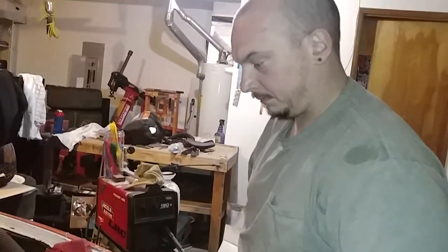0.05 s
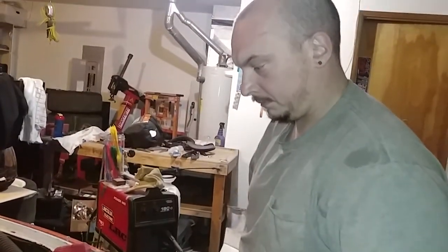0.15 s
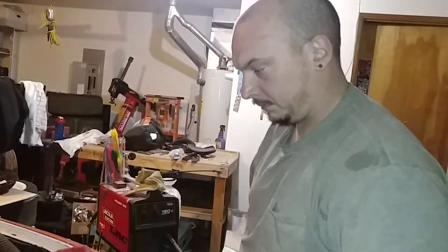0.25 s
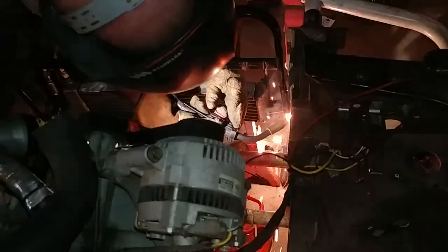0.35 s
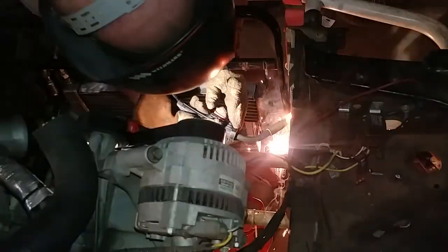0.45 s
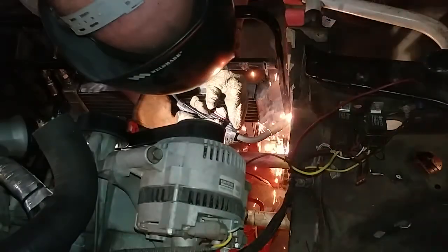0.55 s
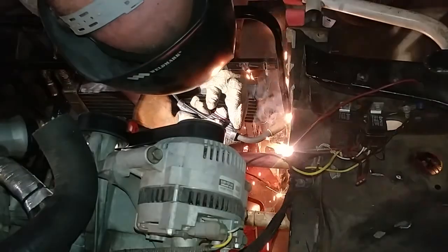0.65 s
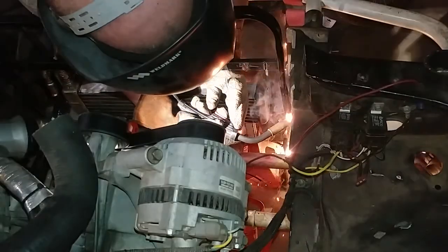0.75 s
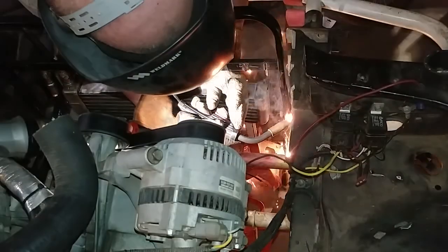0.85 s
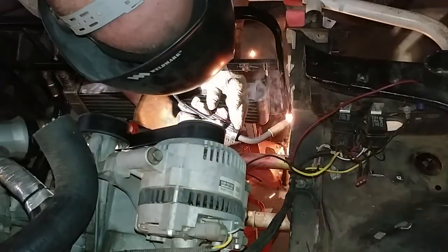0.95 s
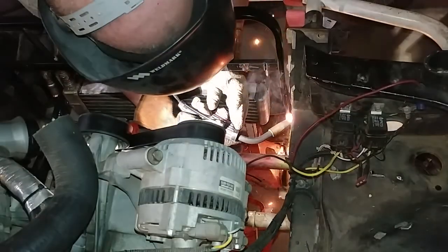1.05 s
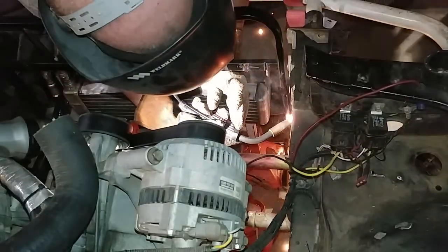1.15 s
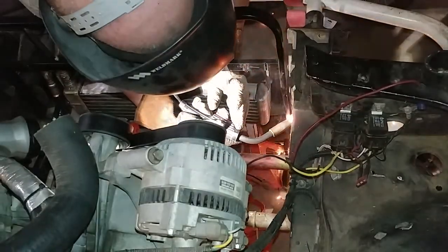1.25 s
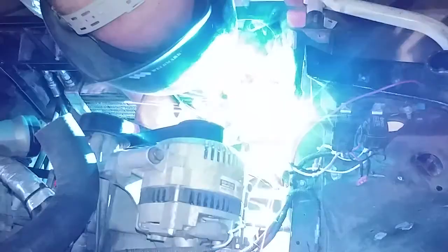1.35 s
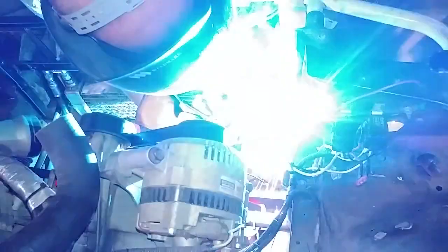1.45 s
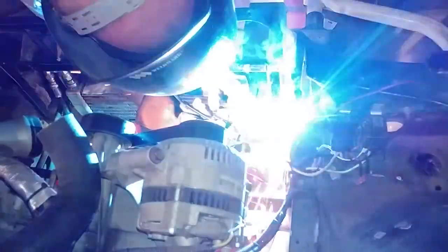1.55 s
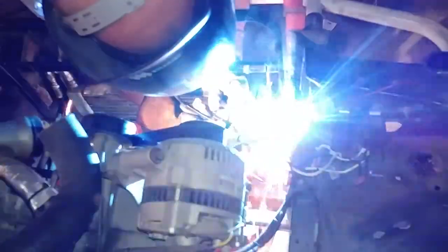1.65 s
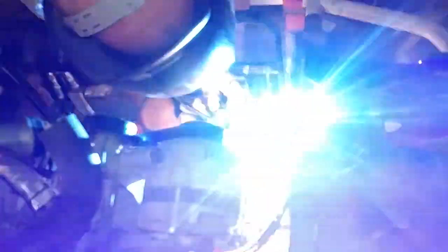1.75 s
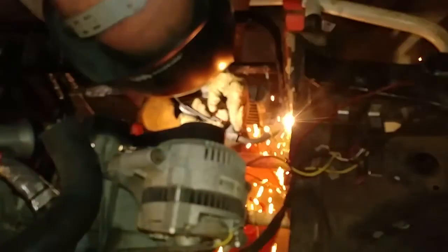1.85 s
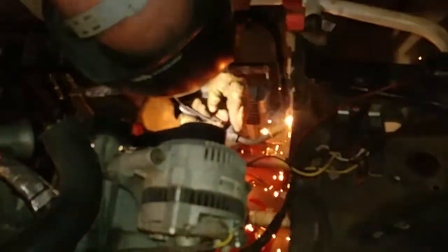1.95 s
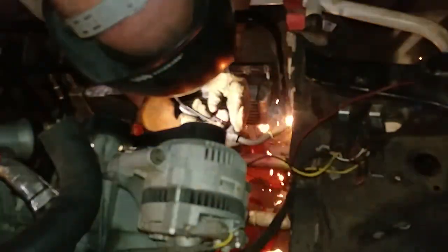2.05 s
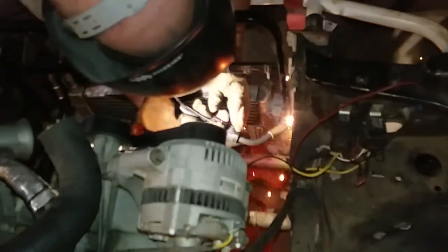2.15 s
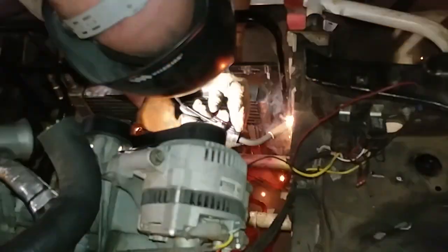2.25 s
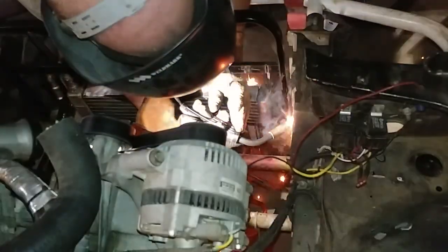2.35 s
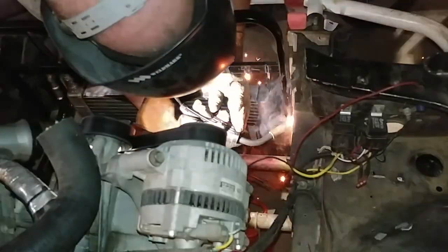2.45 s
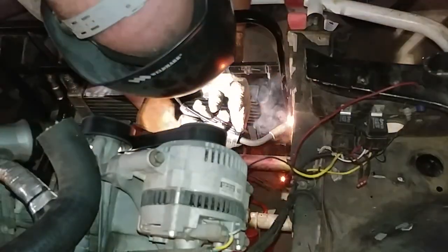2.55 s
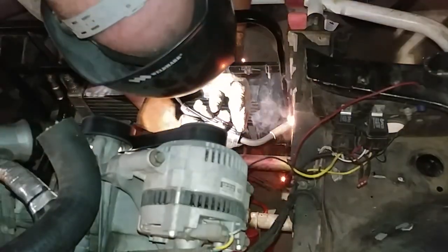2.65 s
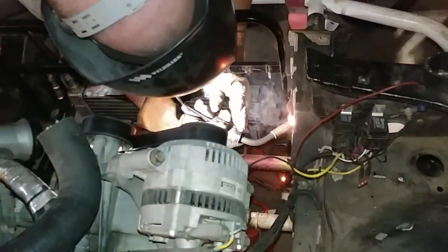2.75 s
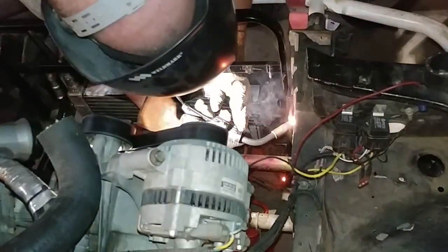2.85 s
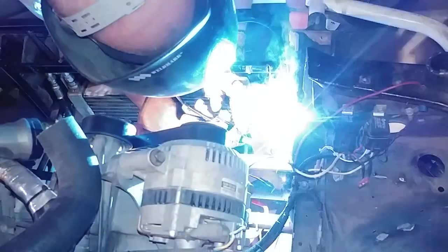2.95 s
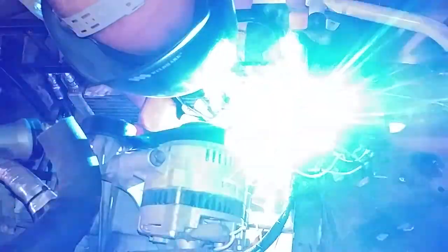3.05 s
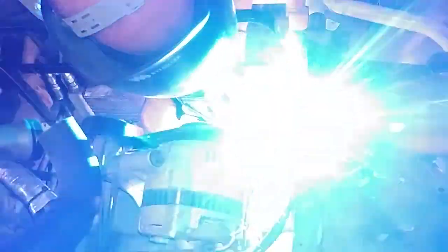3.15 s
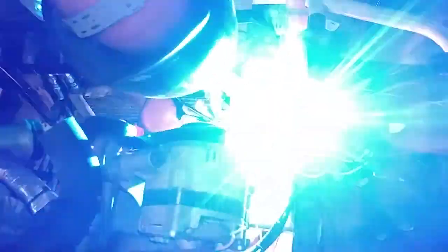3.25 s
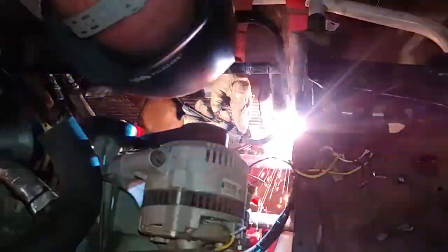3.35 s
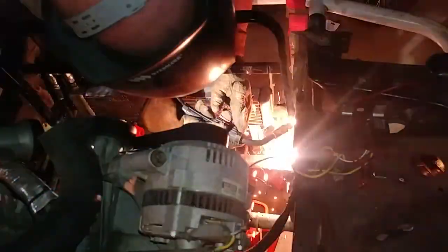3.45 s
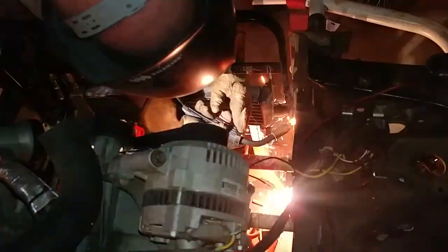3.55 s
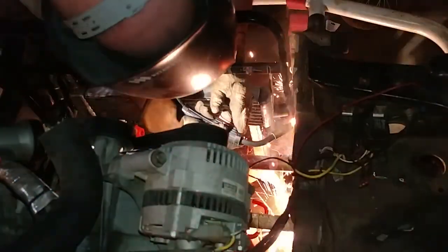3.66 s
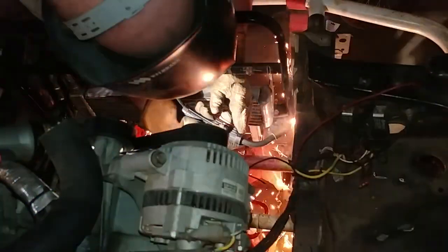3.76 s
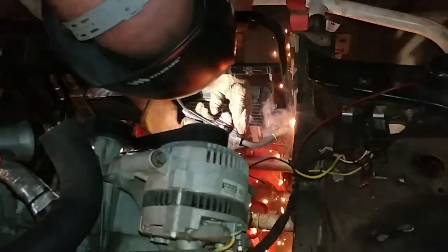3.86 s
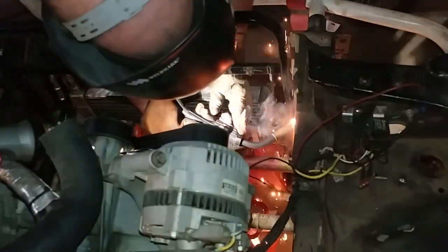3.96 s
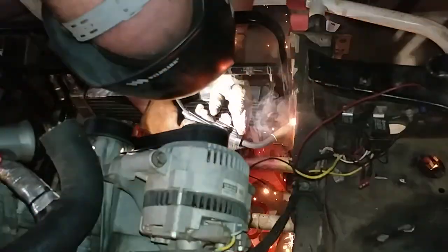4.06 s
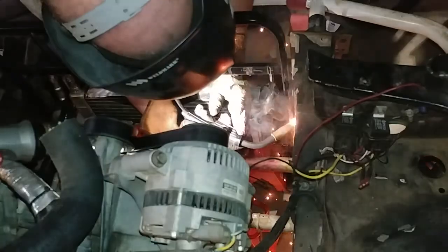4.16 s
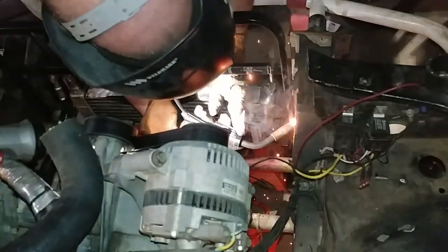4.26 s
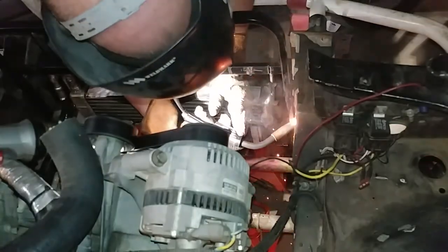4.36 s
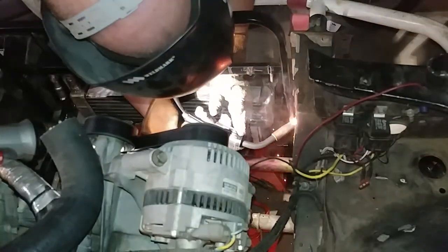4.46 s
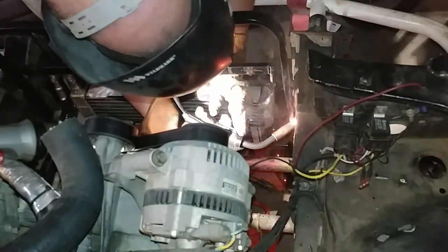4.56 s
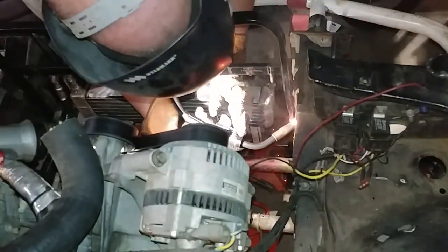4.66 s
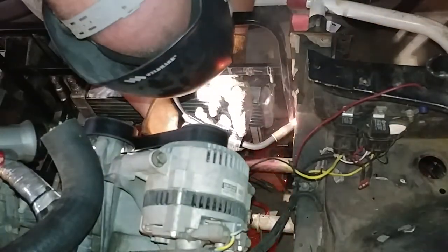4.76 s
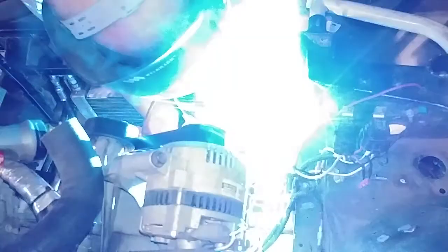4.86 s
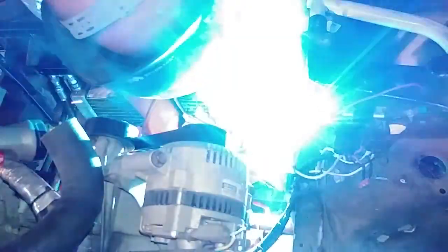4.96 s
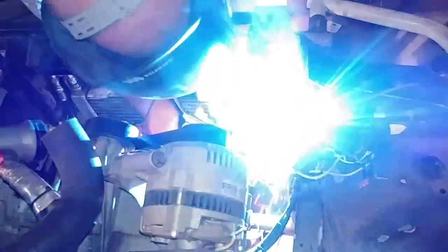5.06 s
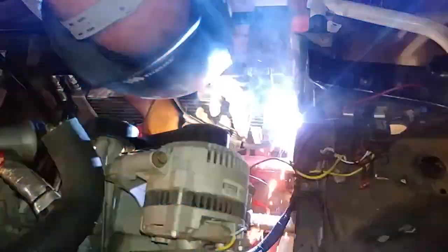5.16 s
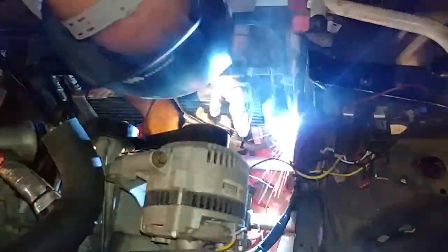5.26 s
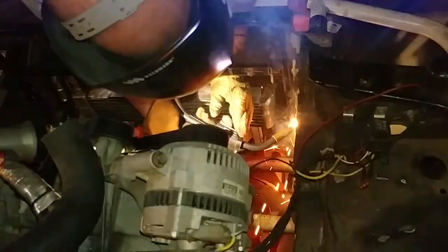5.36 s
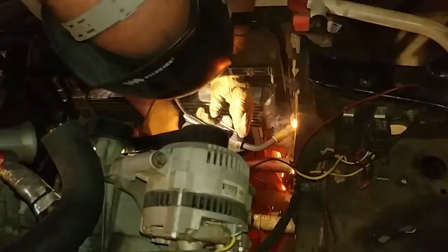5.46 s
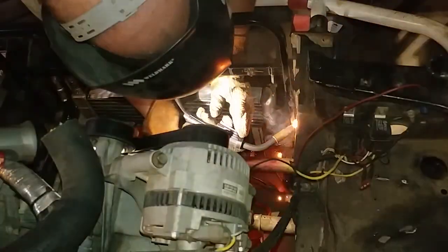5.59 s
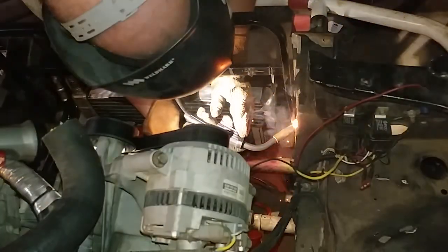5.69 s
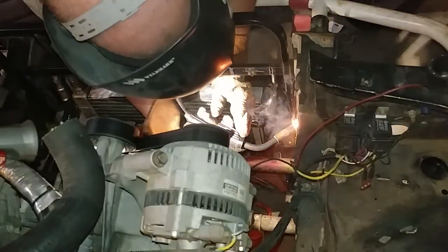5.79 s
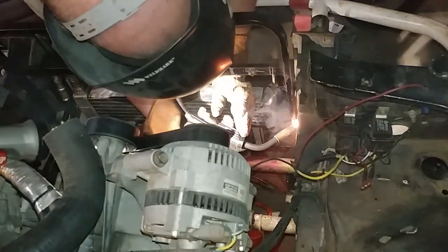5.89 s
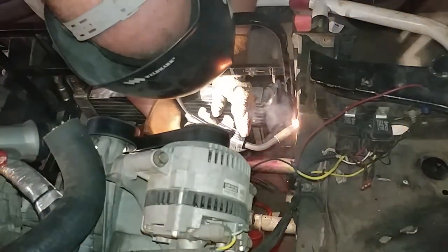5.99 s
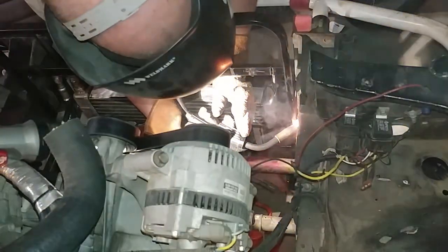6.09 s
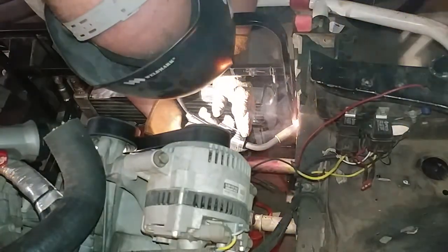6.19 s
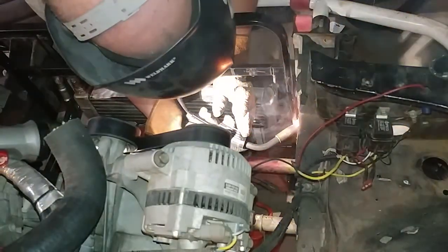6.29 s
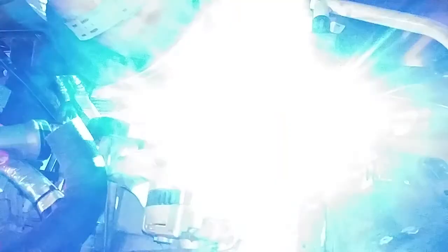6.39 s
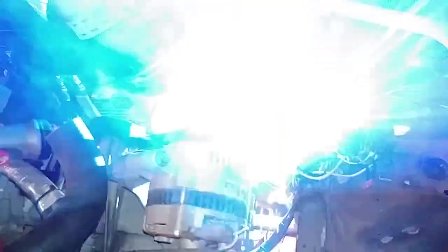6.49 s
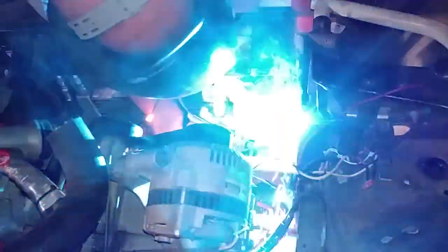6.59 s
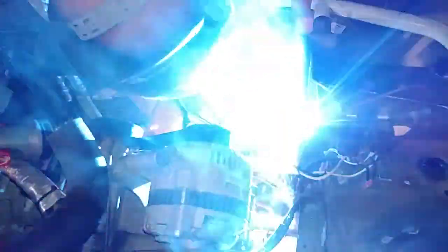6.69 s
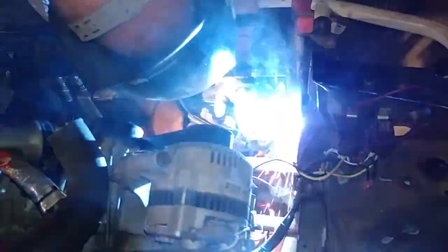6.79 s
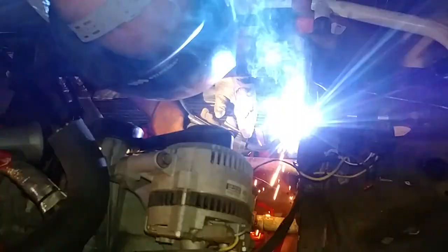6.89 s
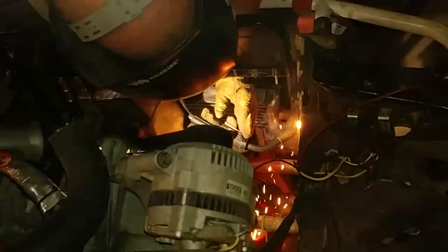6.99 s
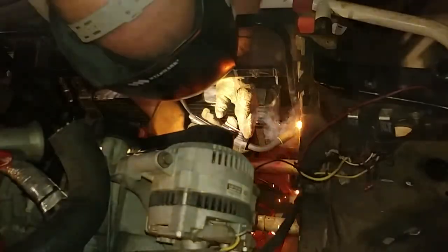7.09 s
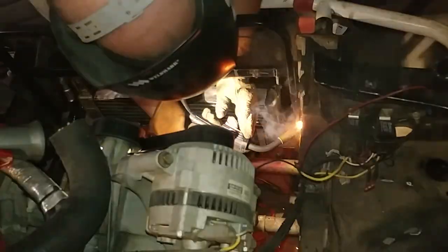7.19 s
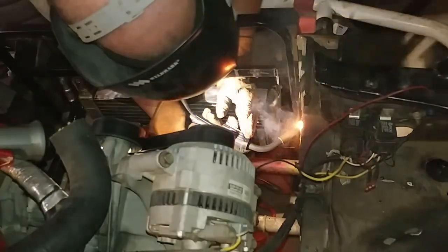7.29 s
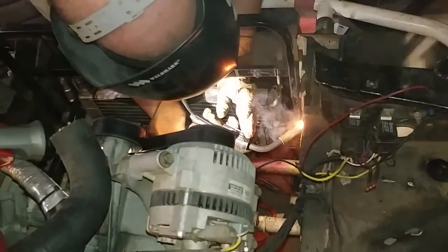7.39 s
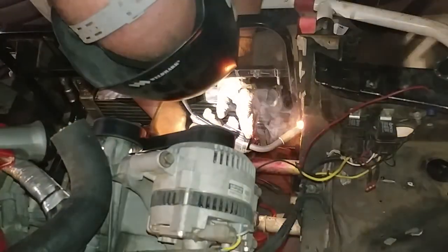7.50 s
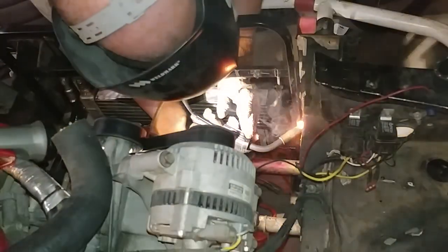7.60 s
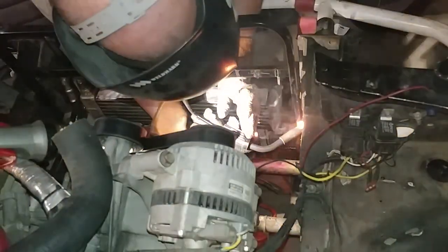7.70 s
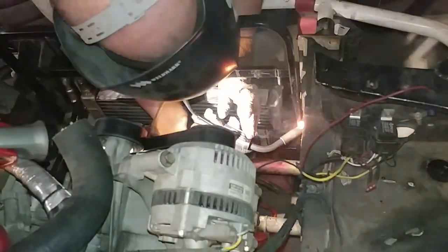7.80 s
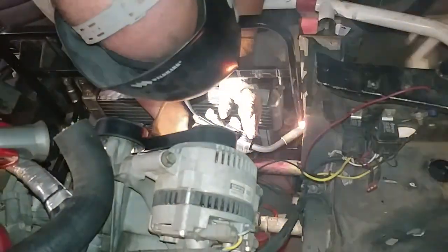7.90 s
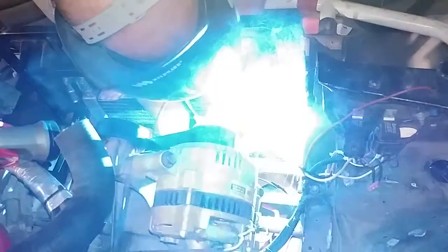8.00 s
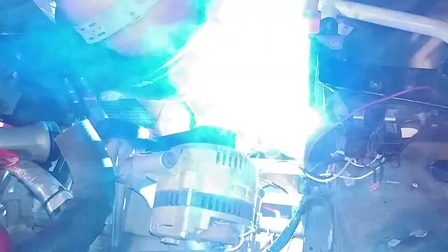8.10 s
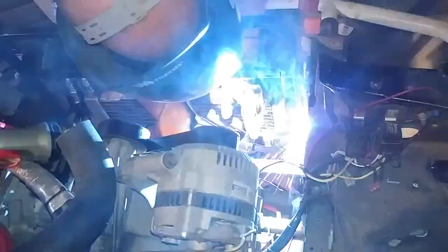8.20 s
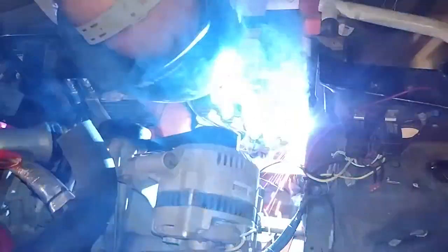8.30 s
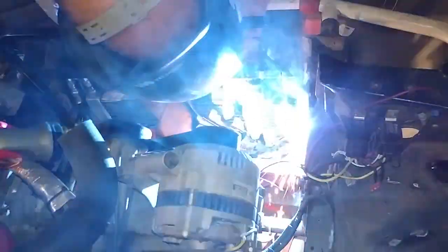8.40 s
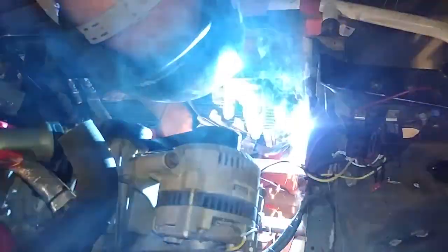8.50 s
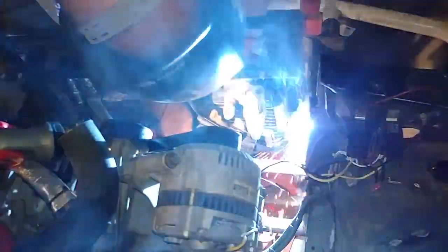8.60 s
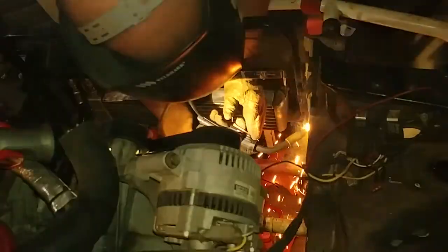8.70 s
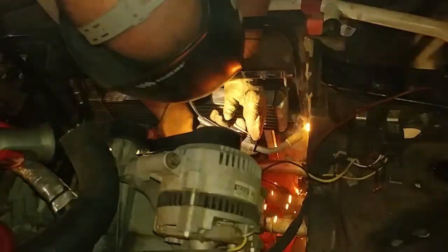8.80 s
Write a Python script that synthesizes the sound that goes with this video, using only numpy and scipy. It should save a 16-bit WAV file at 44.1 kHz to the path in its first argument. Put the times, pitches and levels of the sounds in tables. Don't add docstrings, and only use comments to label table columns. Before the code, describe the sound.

Loud, distorted bursts of arc-welding crackle snap on and off with quiet pauses between, while a machine's cooling fan hums steadily in a small garage.

```python
import sys
import numpy as np
from scipy import signal
from scipy.fft import rfft, irfft
from scipy.io import wavfile

SR = 44100
rng = np.random.default_rng(int(sys.argv[2]) if len(sys.argv) > 2 else 0)


def put_to_file(sound):
    columns = np.atleast_2d(sound).T
    safe = np.clip(columns, -1, 1)
    whole_steps = np.round(safe * 32767)
    wavfile.write(sys.argv[1], SR, whole_steps.astype(np.int16))


def makeup_ratio(level_db):
    decades = np.asarray(level_db, float) / 20
    return 10 ** decades


N = 389844
TIME = np.arange(N) / SR


# start_s, end_s, level_db, build_s, change_db
ARC_SPELLS = [(1.51, 1.877, -7.5, 0.026, -1.5), (2.987, 3.223, -14.5, .05, 8.5),
              (3.422, 3.478, -13.5, .002, 2), (4.999, 5.211, -9.5, .028, 0), (5.253, 5.287, -11.5, .04, 0),
              (5.31, 5.386, -10, .012, 0.5), (6.44, 6.453, -18.5, .002, 2), (6.579, 6.716, -7, .03, -4),
              (6.797, 6.957, -9.5, .03, 0.5), (8.059, 8.106, -12.5, .02, -3.5),
              (8.164, 8.7, -7, 0.032, -5.5)]


def arc():
    shorts_per_s, cold_db = 780, -12
    level = np.zeros(N)
    for start, end, level_db, build, change_db in ARC_SPELLS:
        on = (TIME >= start) & (TIME < end)
        t = TIME[on] - start
        coldness = np.clip(1 - t / max(build, 1e-3), 0, 1)
        level[on] = makeup_ratio(level_db + cold_db * coldness + change_db * t / (end - start))
    sizes = makeup_ratio(6.0 * np.minimum(rng.exponential(1, N), 3.5)) * rng.choice([-1, 1], N)
    breaks = rng.random(N) < shorts_per_s / SR
    snaps = breaks * sizes * np.sqrt(SR / shorts_per_s / np.mean(sizes ** 2))
    plasma = 0.35 * rng.standard_normal(N)
    flicker = makeup_ratio(1.0 * drift(40))
    return level * flicker * (snaps + plasma)


# time_s, peak_db, thud_db
STRIKES = [(1.4098, -9.5, 10), (1.506, -11.5, 12.5), (2.9871, -1, -10.5), (3.343, -15.5, 13),
           (3.376, -10, 3), (3.393, -13.5, 0.5), (3.427, -11, -1), (4.9016, -10.5, 11), (4.92, -18.5, 9),
           (5.002, -19.5, 6), (5.256, -2.5, -6), (6.4348, -3, -22), (6.445, 2, -20), (6.573, -9.5, 8.5),
           (6.796, -12.5, 2.5), (8.058, -2, -14.5), (8.143, -2.5, -0.5)]


def strikes():
    thud_hz, sputter_s = 800, .0028
    events = [(*strike, thud_hz, sputter_s) for strike in STRIKES]
    return bursts(events, gain_db=4, sharpness=0.94)


# time_s, peak_db, ring_db, ring_hz, length_s
KNOCKS = [
    (.178, -28.5, 15.5, 2240, 0.0014),
    (.535, -56, 45.5, 298, 0.022),
    (.562, -38, 34, 466, 0.0088),
    (.64, -44.5, 18, 600, 0.0049),
    (.977, -51, 7.5, 900, 0.0075),
    (3.721, -36, 38.5, 320, 0.0035),
    (3.74, -45, 22, 600, 0.0078),
    (3.85, -37.5, 5.5, 1518, 0.015),
]


def knocks():
    return bursts(KNOCKS, gain_db=7.5, sharpness=6.0)


def bursts(events, gain_db, sharpness):
    out = np.zeros(N)
    count = 4000
    for s, peak_db, ring_db, ring_hz, length in events:
        sputter = 0.22 * rng.standard_normal(count) * np.exp(-TIME[:count] / max(length, 1e-4))
        sputter[0] = 1.5
        resonance = signal.iirpeak(ring_hz, sharpness, fs=SR)
        ring = makeup_ratio(ring_db) * signal.lfilter(*resonance, sputter)
        i = round(s * SR)
        out[i:i + count] += makeup_ratio(peak_db + gain_db) * (sputter + ring)
    return out


# pitch_hz, level_db (per Hz)
SPARK_TONE = [(40, -31.5), (250, -12), (700, -14.5), (1600, -5.5), (2000, -6), (3200, -1), (4700, 1.5),
              (6000, -4.5), (7200, -9), (12000, -8.5), (16000, -9.5)]


def spark_colour(x):
    return colour(x, SPARK_TONE)


def direct(hits):
    die_s, bright_hz = 0.023, 5020
    first = diffuse(1024) * makeup_ratio(-60 * TIME[:1024] / die_s)
    highpass = signal.butter(2, bright_hz, "high", fs=SR, output="sos")
    bright = signal.sosfilt(highpass, spark_colour(hits))
    return makeup_ratio(-4) * signal.oaconvolve(bright, rms_one(first) / 32, axes=1)[:, :N]


# time_s, level_db
THUMPS = [
    (1.411, -29),
    (1.507, -31),
    (4.902, -28.5),
    (6.7, -30.5),
    (8.19, -34.5),
]


def thumps():
    pushes = np.zeros(N)
    for s, db in THUMPS:
        pushes[round(s * SR)] = makeup_ratio(db + 47.5)
    soft = signal.lfilter([.05], [1, -.95], pushes + 1e-18)
    return signal.lfilter(*signal.iirpeak(260, 3.5, fs=SR), soft)


# pull_s, release_s, snap_db, gas_db
TRIGGER = [
    (1.348, 1.852, -26.5, -41.5),
    (2.922, 3.479, -28.5, -40),
    (4.854, 5.382, -31.5, -41.5),
    (6.378, 6.987, -24.5, -39.5),
    (8.004, 8.707, -31.5, -39),
]
# pitch_hz, level_db (per Hz)
GAS_TONE = [(180, -20), (300, 2), (1390, -10.5), (1780, 0), (3280, -20.5), (4650, -9), (6360, -7.5),
            (7370, -16.5), (8840, -15), (10100, -16), (15500, -6.5)]


def gas():
    valve_hz, ring_s = 6830, 0.026
    out, jet, t = np.zeros(N), rng.standard_normal(N), TIME[:2000]
    snap = np.cos(2 * np.pi * valve_hz * t) * makeup_ratio(-60 * t / ring_s - 16.5)
    snap[0] = 1
    for pull, release, snap_db, gas_db in TRIGGER:
        held = (TIME >= pull) & (TIME < release)
        rush = 1 + np.exp(-(TIME[held] - pull) / 0.014)
        out[held] = makeup_ratio(gas_db) * jet[held] * rush
        i = round(pull * SR)
        out[i:i + len(t)] += makeup_ratio(snap_db + 13.5) * snap
    return colour(out, GAS_TONE)


# time_s, peak_db
PUFFS = [
    (1.539, -26.5),
    (8.069, -37.5),
    (8.189, -29),
    (8.599, -38.5),
]


def puffs():
    out = np.zeros(N)
    for s, peak_db in PUFFS:
        t = np.clip(TIME - s, 0, None)
        lump = np.sin(2 * np.pi * 52 * t) * t / .025 * np.exp(-t / 0.015)
        out += makeup_ratio(peak_db + 15.0) * lump
    return out * makeup_ratio([[3], [-5]])


# pitch_hz, width_hz, gain_db
HOLLOWS = [(814, 310, 6.5), (1595, 95, 4.5), (1830, 90, -5), (2460, 600, 1), (3300, 500, 1), (4540, 290, 3),
           (5960, 750, 1), (325, 80, -2)]


def around_the_seam(weld):
    return peaks(weld, HOLLOWS) * makeup_ratio([[0], [2.2]])


# pitch_hz, time_s
GARAGE_RING = [(100, 0.61), (500, 0.29), (1500, 0.23), (4000, 0.28), (9000, 0.22), (11500, 0.32),
               (16000, 0.17)]


def garage(x):
    t = TIME[:SR // 2]
    count = len(t)
    white = [diffuse(count), diffuse(count)]
    edges = np.geomspace(30, 19000, 15)
    tail = np.zeros((2, count))
    for k, (low, high) in enumerate(zip(edges, edges[1:])):
        band = signal.butter(2, [low, high], "band", fs=SR, output="sos")
        fall_s = at_hz(GARAGE_RING, np.sqrt(low * high))
        tail += signal.sosfilt(band, white[k % 2]) * makeup_ratio(-60 * t / fall_s)
    tail *= 1 - np.exp(-t / 0.0042)
    bay = diffuse(count) * makeup_ratio(-60 * t / .1)
    near = signal.lfilter([1, -.5], [1], diffuse(count)) * makeup_ratio(-60 * t / .02)
    response = rms_one(tail) + makeup_ratio(-7) * rms_one(bay) + makeup_ratio(2) * rms_one(near)
    return signal.oaconvolve(x, response / np.sqrt(2 * count), axes=1)[:, :N]


# time_s, peak_db, fade_db_per_s
RUSTLES = [
    (0.0, -64.5, 9),
    (1.0, -73.5, 31),
    (2.36, -79, 41.5),
    (3.7, -62, 150.5),
    (3.83, -55.5, 60),
    (5.65, -72.5, 24),
]


def sizzle():
    rise_db_s = 90
    level = makeup_ratio(-79) * np.ones(N)
    for s, db, fade_db_s in RUSTLES:
        level += makeup_ratio(db - np.where(TIME < s, rise_db_s * (s - TIME), fade_db_s * (TIME - s)))
    return level * makeup_ratio(-1.0 + 1.5 * drift(25)) * spark_colour(diffuse(N))


# pitch_hz, level_db (per Hz)
FAN_AIR = [(20, -27), (40, -22.5), (65, -6.5), (110, -7), (160, -8), (270, -7), (340, -10.5), (560, -11.5),
           (700, -12), (1300, -19.5), (2000, -23.5), (3500, -25.5), (6000, -38), (8700, -55), (15500, -46)]
# pitch_hz, gain_db
CLOSE_TONE = [(25, 20.5), (120, 5), (400, 9), (1200, 9), (4000, 5), (9000, 7.5), (16000, -7.5)]


def fan_air(close):
    air = makeup_ratio(-54.5 + 0.78 * drift(7.7)) * colour(diffuse(N), FAN_AIR)
    return close * makeup_ratio(10.5) * colour(air, CLOSE_TONE) + (1 - close) * air


# pitch_hz, left_db, right_db, left_lead_rad, width_hz, close_db (extra when close)
FAN_TONES = [(118, -65.5, -65.5, -12, 5.5, 11.5), (209, -67.5, -78, 0, 14, 5),
             (258, -50.5, -49, -0.23, 0.24, 8), (416, -65, -65.5, -0.5, 9.0, 5.5),
             (512, -67.5, -64, 0.56, 1.5, 20), (543, -63.5, -59, 1.45, 7.4, 7),
             (865, -61, -71.5, 3.5, 4.8, 11), (1015, -74, -66, -8.5, 7.9, 19),
             (1184, -76, -77, 1, 7.5, 6.5), (1263, -75, -66.5, 1.5, 3.0, 17.5),
             (1797.5, -60, -60, 2.1, 1.0, 1.5), (2050, -84, -74.5, -2.5, 3.5, 21)]
# start_s, depth_db
SAGS = [
    (0, 10),
    (1.87, 11.5),
    (3.6, 5.5),
    (5.381, 7.5),
    (6.981, 12),
]


def fan_tones(close):
    whine_db = np.zeros(N)
    for start, sag_db in SAGS:
        after = TIME >= start
        whine_db[after] = 7.5 - sag_db * np.exp(-(TIME[after] - start) / .8)
    out = np.zeros((2, N))
    for hz, left_db, right_db, lead, width_hz, close_db in FAN_TONES:
        phase = 2 * np.pi * np.cumsum(hz + .9 * width_hz * drift(3 * width_hz)) / SR
        load_db = whine_db * (hz > 1500)
        waver_db = 0.65 * width_hz * drift(2 * width_hz)
        swell = np.sqrt(2) * makeup_ratio(close * close_db + load_db + waver_db)
        out += swell * makeup_ratio([[left_db], [right_db]]) * np.sin(phase + np.array([[lead], [0]]))
    return out


def fan():
    close = np.clip((.333 - TIME) / .006, 0, 1)
    return fan_air(close) + fan_tones(close)


# time_s, level_db
DISTANT = [
    (0, -58.5),
    (2.6, -52),
    (4.2, -50),
    (5.599, -59.5),
    (8.84, -60),
]
# pitch_hz, level_db (per Hz)
RUMBLE_TONE = [(30, -27), (60, -4), (100, 5.5), (130, 0), (170, -24.5), (400, -60.5)]


def distant_rumble():
    s, level_db = np.transpose(DISTANT)
    return makeup_ratio(np.interp(TIME, s, level_db)) * colour(rng.standard_normal(N), RUMBLE_TONE)


def at_hz(points, hz):
    table = np.array(points)
    return np.interp(np.log(hz), np.log(table[:, 0]), table[:, 1])


def rms_one(x):
    return x / np.sqrt(np.mean(x ** 2) + 1e-20)


def colour(x, spectrum):
    size = 8192
    hz = np.maximum(np.arange(size // 2 + 1) * SR / size, 1)
    cepstrum = irfft(np.log(makeup_ratio(at_hz(spectrum, hz))))
    cepstrum[1:size // 2] *= 2
    cepstrum[size // 2 + 1:] = 0
    taps = irfft(np.exp(rfft(cepstrum)))
    taps /= np.sqrt(np.sum(taps ** 2))
    return signal.fftconvolve(np.atleast_2d(x), taps[None], axes=1)[:, :N]


def peaks(x, modes):
    for hz, width_hz, peak_db in modes:
        w, a = 2 * np.pi * hz / SR, makeup_ratio(peak_db / 2)
        k = np.sin(w) * width_hz / hz / 2
        top = [1 + k * a, -2 * np.cos(w), 1 - k * a]
        bottom = [1 + k / a, -2 * np.cos(w), 1 - k / a]
        x = signal.lfilter(top, bottom, x)
    return x


# pitch_hz, likeness
LIKENESS = [(60, 0.75), (180, 1), (550, 0.47), (1650, 0.13), (4970, -0.044), (15000, -0.13)]


def diffuse(count):
    hz = np.maximum(np.arange(count // 2 + 1) * SR / count, 1)
    alike = np.clip(at_hz(LIKENESS, hz), -1, 1)
    mid, side = rfft(rng.standard_normal((2, count))) / np.sqrt(2)
    return irfft(np.sqrt(1 + alike) * mid + np.sqrt(1 - alike) * side * [[1], [-1]], count)


def drift(rate_hz):
    r = np.exp(-2 * np.pi * rate_hz / SR)
    return rms_one(signal.lfilter([1], [1, -2 * r, r * r], rng.standard_normal(N + SR))[SR:])


def scene():
    pops = strikes()
    sparks, one_side = arc(), rng.random(N) < .5
    first_side = spark_colour(sparks * one_side + pops + knocks()) + gas()
    second_side = spark_colour(sparks * ~one_side)
    weld = garage(first_side) + garage(second_side) + thumps() + direct(pops)
    return around_the_seam(weld) + puffs() + sizzle() + fan() + distant_rumble()


def band_limit(x):
    return signal.sosfilt(signal.butter(12, 15900, fs=SR, output="sos"), x)


# pitch_hz, width_hz, gain_db
PORTS = [(8723, 2880, 18), (10400, 1400, -10)]


def record(dry):
    threshold_db, share_removed, release_db_s = -11, 0.61, 90
    x = peaks(dry, PORTS)
    power = signal.lfilter([.004], [1, -(1 - .004)], np.mean(x ** 2, axis=0))
    level_db = 10 * np.log10(power + 1e-12)
    held_db = np.maximum.accumulate(level_db + release_db_s * TIME) - release_db_s * TIME
    x = x * makeup_ratio(-share_removed * np.clip(held_db - threshold_db, 0, None))
    return band_limit(np.clip(x, -.9, .9))


dry = scene()
out = record(dry)
put_to_file(out)
```